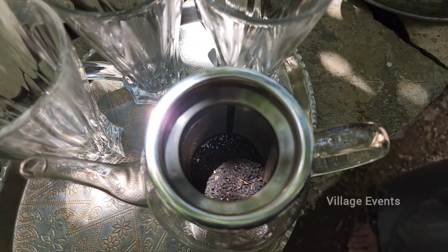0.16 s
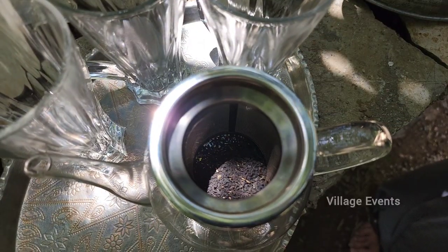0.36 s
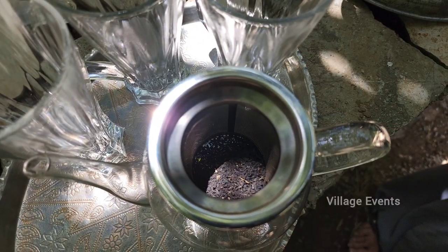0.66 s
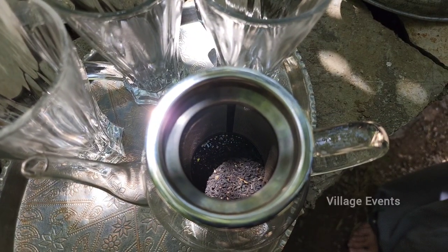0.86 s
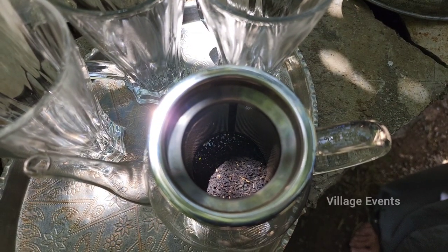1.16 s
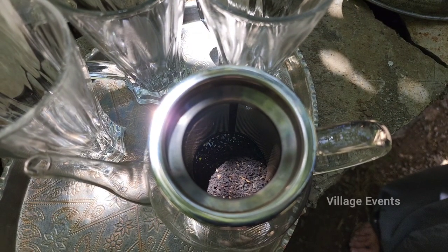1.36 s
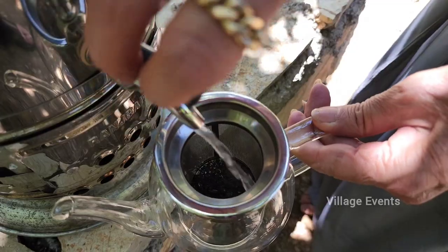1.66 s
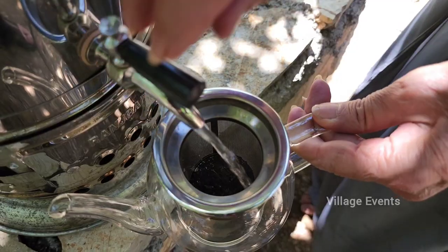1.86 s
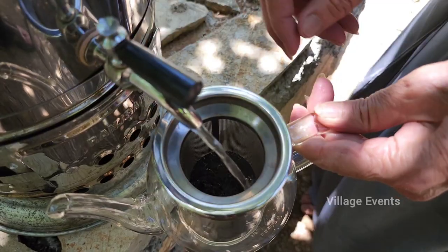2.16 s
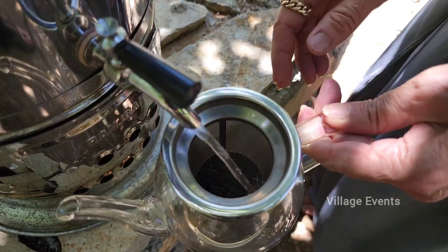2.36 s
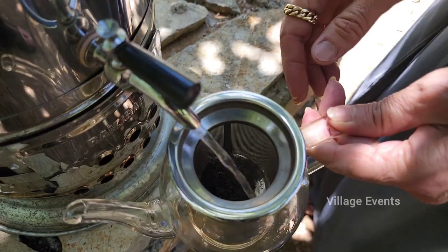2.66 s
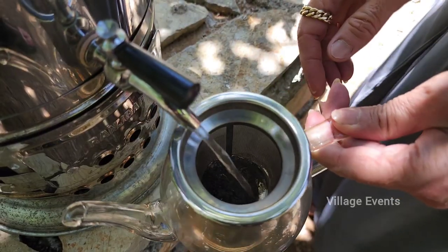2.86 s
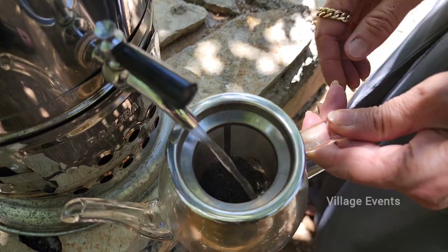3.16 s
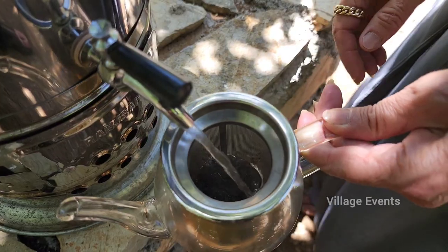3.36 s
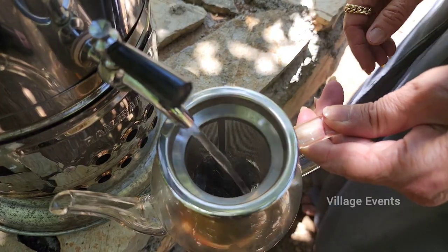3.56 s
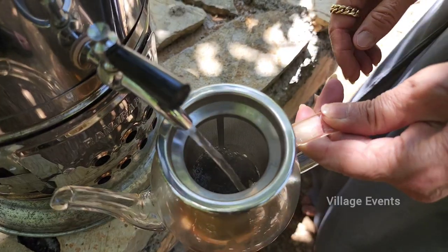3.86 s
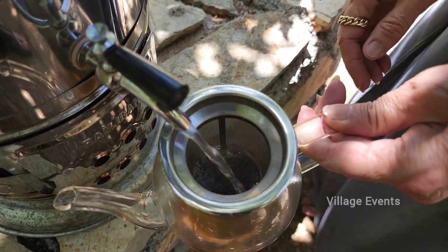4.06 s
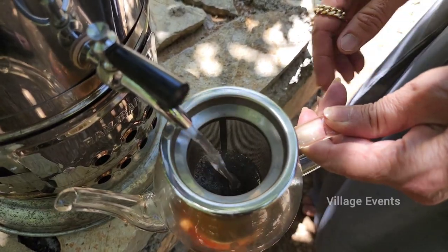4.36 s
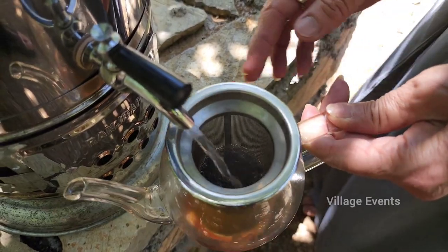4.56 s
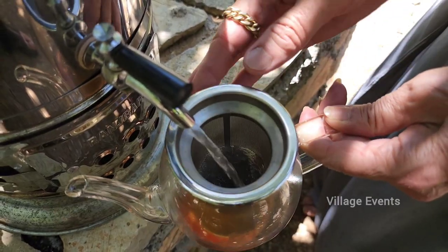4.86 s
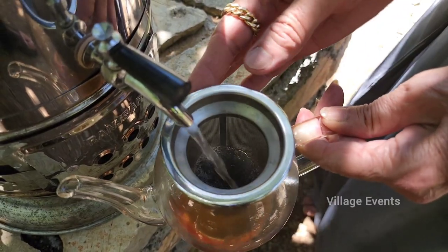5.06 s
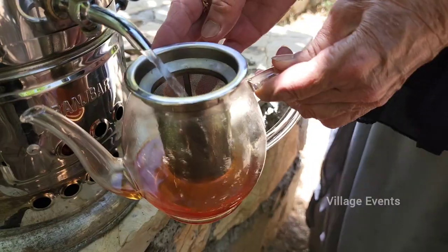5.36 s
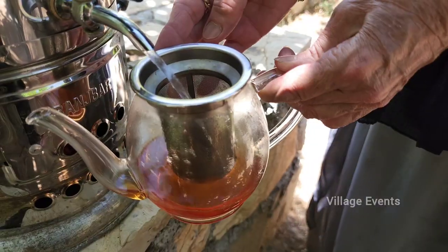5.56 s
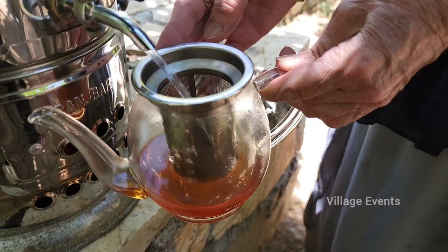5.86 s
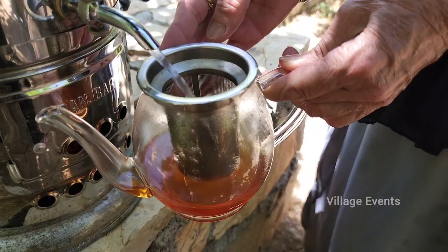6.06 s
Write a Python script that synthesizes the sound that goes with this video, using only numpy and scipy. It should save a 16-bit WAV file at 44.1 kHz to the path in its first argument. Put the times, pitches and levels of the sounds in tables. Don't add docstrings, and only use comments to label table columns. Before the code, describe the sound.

A shaded outdoor terrace, heard close on a handheld stereo microphone, with a dense high cicada buzz throughout and a faint low wavering hum. At about 0.25 s a soft wind gust comes with dull knocks and small ticks, another bright tick at 0.4 s. A light glass-metal clink sounds at 0.9 s on the right, then a loud, hard, ringing clink at 1.2 s, followed by ticks and knocks to 1.5 s. An abrupt cut: the cicadas drop a little and water trickles into a pot on the left, hollow low gurgling with tiny bright bubbles. Faint knocks and a rustle near 2.6 s. A drip plinks at 3.85 s; the stream falters around 4.1-4.4 s with small drips, then surges, with knocks at 4.5-4.7 s. After another cut at 5.15 s the trickle is softer, with many light dull taps and low wind thumps, strongest near 5.4 s, until 6.3 s.

```python
import sys
import numpy as np
from scipy import signal
from scipy.fft import rfft, irfft, next_fast_len
from scipy.io import wavfile

SR = 44100
rng = np.random.default_rng(int(sys.argv[2]) if len(sys.argv) > 2 else 0)


def level_to_linear(level):
    exponent = np.asarray(level, float) / 20
    return 10 ** exponent


def master_out(mix):
    frames = np.transpose(np.atleast_2d(mix))
    ceiling = np.clip(frames, -1, 1)
    pcm = np.round(ceiling * 32767).astype(np.int16)
    wavfile.write(sys.argv[1], SR, pcm)


N = 273508
T = np.arange(N) / SR


def rms_one(x):
    return x / np.sqrt(np.mean(x ** 2) + 1e-20)


def in_time(rows):
    s, *columns = np.transpose(rows)
    return [np.interp(T, s, column) for column in columns]


def at_hz(points, hz):
    table_hz, values = np.array(points)[:, :2].T
    return np.interp(np.log(hz), np.log(table_hz), values)


def band(x, low_hz, high_hz):
    return signal.sosfilt(signal.butter(2, [low_hz, high_hz], "band", fs=SR, output="sos"), x)


def drift(rate_hz):
    r = np.exp(-80 * np.pi * rate_hz / SR)
    slow = signal.lfilter([1], [1, -2 * r, r * r], rng.standard_normal(N // 40 + 2002))[2000:]
    return np.interp(np.arange(N) / 40, np.arange(len(slow)), rms_one(slow))


def ring(clicks, hz, t60_s):
    r, w = level_to_linear(-60 / (t60_s * SR)), 2 * np.pi * hz / SR
    return signal.lfilter([0, np.sin(w)], [1, -2 * r * np.cos(w), r * r], clicks + 1e-18)


def struck(blow, hz, t60_s):
    return band(ring(blow, hz, t60_s), .88 * hz, 1.13 * hz)


def place(x, pan_db, lag):
    left = level_to_linear(pan_db / 2) * np.roll(x, max(lag, 0))
    right = level_to_linear(-pan_db / 2) * np.roll(x, max(-lag, 0))
    return np.array([left, right])


def add(out, s, sound):
    i = round(s * SR)
    out[:, i:i + sound.shape[1]] += sound[:, :N - i]


TAKES_S = [0, 1.497, 5.155, 6.3]


def take_at(s):
    return np.searchsorted(TAKES_S, s, side="right") - 1


# level_db, left_right_db, fall_db_per_s
CHORUS = [
    (-37.5, -0.1, 0),
    (-41.5, .6, 0.15),
    (-42, 3, 0.2),
]
# membrane_hz, level_db, t60_s
SINGERS = [(6000, -11.5, 0.0041), (6490, -4, 0.011), (6720, -4, 0.019), (6896, 0, 0.013),
           (7163, -2.5, 0.028), (7790, 1, 0.0038), (7750, -6.5, 0.014), (8125, -3, 0.036),
           (8200, 0, 0.0039), (7970, -6.5, 0.0024), (8634, -1.5, 0.008), (9130, -6, 0.008),
           (9550, -8.5, 0.0063), (10040, -14, .006)]


def cicadas(spread_db, swell_db, jitter):
    out = np.zeros((2, N))
    for side in range(2):
        for hz, db, t60_s in SINGERS:
            rate_hz, detune = rng.uniform(150, 400), rng.normal(0, 0.009)
            gaps = SR / rate_hz * (1 + jitter * rng.standard_normal(3000)).clip(.2)
            at = np.cumsum(gaps).astype(int)
            sizes = level_to_linear(spread_db * rng.standard_normal(3000))
            clicks = np.zeros(N)
            clicks[at[at < N]] = sizes[at < N]
            membrane = rms_one(ring(clicks, hz * (1 + detune), t60_s))
            song = level_to_linear(db + swell_db * drift(8.2)) * membrane
            out[side] += song
            out[1 - side] += 0.59 * np.roll(song, rng.integers(5, 25))
    take = take_at(T)
    start_db, pan_db, fall_db = np.transpose(CHORUS)[:, take]
    level_db = start_db - fall_db * (T - np.take(TAKES_S, take)) + 0.14 * drift(4.5)
    pan_db = pan_db - 0.75 * drift(1.6)
    return rms_one(band(out, 6430, 11900)) * level_to_linear(level_db + 2.5 + pan_db * np.array([[.5], [-.5]]))


# start_s, level_db
FLOW = [(1.5, 2), (1.8, 0), (2.45, 2), (2.8, 2), (3.7, 0), (4.1, 0.5), (4.3, -16), (4.6, 4), (5.1, 1.5),
        (5.5, -6.5), (6.2, -5)]
# resonance_hz, width_hz
POT_AIR = [
    (285, 68),
    (590, 98),
]


def water():
    flow_db, = in_time(FLOW)
    gurgle_db = -54.5 + 1.0 * flow_db
    overtone_db = -57 + .8 * flow_db
    trickle_db = -56.5 + 0.65 * flow_db
    sizes = level_to_linear(2.5 * np.minimum(rng.exponential(1, (3, N)), 5)) * rng.choice([-1, 1], (3, N))
    births_per_s = np.array([[350], [350], [900]]) * level_to_linear(4.5 * drift(7))
    low, high, small = sizes * (rng.random((3, N)) < births_per_s / SR)
    (pot_hz, pot_width_hz), (overtone_hz, overtone_width_hz) = POT_AIR
    out = level_to_linear(gurgle_db) * rms_one(ring(low, pot_hz, 2.26 / pot_width_hz))
    out += level_to_linear(overtone_db) * rms_one(ring(high, overtone_hz, 2.7 / overtone_width_hz))
    dealt = rng.integers(0, 10, N)
    fizz = sum(ring(small * (dealt == k), hz, 13.0 / hz) for k, hz in enumerate(np.geomspace(1150, 3300, 10)))
    shade_db = -3 * (T > TAKES_S[2])
    out += level_to_linear(trickle_db + shade_db) * rms_one(fizz)
    return place(out * (T > TAKES_S[1]), pan_db=5.5, lag=FAR_LAG[1])


# start_s, peak_db, pitch_hz
DRIPS = [
    (3.842, -33, 1950),
    (4.064, -45, 2030),
    (4.079, -46, 2030),
    (4.110, -40, 1850),
]


def drips():
    out, t = np.zeros((2, N)), T[:3000]
    t60_s, rise_hz_per_s = 0.035, 6800
    for s, db, hz in DRIPS:
        tone = np.sin(2 * np.pi * (hz + rise_hz_per_s * t / 2) * t)
        bubble = tone * level_to_linear(db - 60 * t / t60_s) * np.minimum(t / .002, 1)
        add(out, s, place(bubble, pan_db=9, lag=FAR_LAG[1]))
    return out


NEAR_LAG = [20, -14, -14]
CLINKS_S = [
    .8936,
    1.2094,
]
# crack_db, tail_db, tail_t60_s, left_right_db
CLINKS = [
    (-26, -31, .08, -8),
    (-7, -19, 0.12, -13),
]
# mode_hz, left_db, right_db, t60_s
LIGHT_CLINK = [(1050, -35, -33, .08), (2040, -33, -35, .1), (2215, -37, -32, .17), (2275, -21, -16.5, .075),
               (2320, -34, -30, .17), (3050, -26, -15, .11), (3830, -40, -36, .15), (4288, -35, -26, .045),
               (5050, -36, -25, .05), (5146, -42, -35, .05), (6263, -41, -33, .04), (10800, -44, -36, .015),
               (13100, -45, -37, .015), (15300, -47, -39, .015)]
HARD_CLINK = [(300, -33, -34, .04), (610, -27, -28, .19), (820, -25, -25, .05), (1063, -27, -26, .18),
              (1214, -31, -20, .045), (1545, -41, -43, .4), (2072, -20, -20, .13), (2221, -39, -33, .35),
              (2150, -28, -28, .05), (2235, -10, -6, .046), (2317, -29, -22.5, .27), (3062, -31, -37, .27),
              (3150, -24, -16, .04), (3804, -39, -26, .19), (4027, -34, -26, .1), (4280, -42, -33, .14),
              (4620, -21, -16, .035), (4705, -33, -22, .15), (4993, -38, -30, .13), (5572, -30, -20, .03),
              (5990, -38, -33, .12), (6535, -32, -26, .03), (8002, -28, -19, .025), (11453, -28, -17, .04),
              (12632, -29, -18, .045), (13937, -32, -21, .04), (15200, -35, -25, .045)]


def clinks():
    out, t = np.zeros((2, N)), T[:16000]
    for s, row, modes in zip(CLINKS_S, CLINKS, [LIGHT_CLINK, HARD_CLINK]):
        crack_db, tail_db, tail_t60_s, pan_db = row
        contacts = rng.standard_normal(16000) * (rng.random(16000) < 900 / SR)
        chatter = contacts * level_to_linear(-31 - 60 * t / .12)
        blow = (t == 0) + chatter
        body = np.zeros((2, 16000))
        for hz, left_db, right_db, t60_s in modes:
            mode = place(struck(blow, hz, t60_s), left_db - right_db, NEAR_LAG[0])
            body += mode * level_to_linear((left_db + right_db) / 2)
        crack = band(rng.standard_normal(16000), 2500, 14300) * level_to_linear(crack_db - 60 * t / .017)
        tail = band(rng.standard_normal((2, 16000)), 2700, 7000)
        tail = tail * level_to_linear(tail_db - 60 * t / tail_t60_s) * np.minimum(t / 0.0019, 1)
        tail = tail * level_to_linear([[pan_db / 2], [-pan_db / 2]])
        add(out, s, body + place(crack, pan_db, NEAR_LAG[0]) + tail)
    return out


# start_s, peak_db, pitch_hz
KNOCKS = [(.2613, -26.5, 456), (0.2656, -26, 760), (.272, -28.5, 684), (1.2125, -30.5, 240),
          (1.3019, -25, 309), (1.328, -28, 530), (1.402, -36.5, 294), (1.491, -33, 280), (2.546, -39, 600),
          (2.586, -37, 586), (2.67, -40, 550), (2.718, -43, 596), (4.279, -37, 300), (4.539, -31, 644),
          (4.665, -31, 650), (4.947, -42, 630), (5.241, -39, 790), (5.27, -41, 680), (5.29, -39, 680),
          (5.355, -35, 696), (5.405, -43, 640), (5.447, -41, 730), (5.463, -46, 746), (5.514, -39, 770),
          (5.526, -33.5, 720), (5.545, -41, 715), (5.621, -39, 725), (5.643, -43, 640), (5.71, -44, 705)]
HANDS_PAN_DB = [-2, 5.5, 3.5]


def knocks():
    out = np.zeros((2, N))
    push = np.zeros(6000)
    push[:30] = np.hanning(30) / 15
    for s, db, hz in KNOCKS:
        t60_s = 21 / hz
        body = ring(push, hz, t60_s) + 0.67 * ring(push, 1.314 * hz, 0.37 * t60_s)
        knock = level_to_linear(db + 3.0) * band(body, 254, 2200)
        add(out, s, place(knock, HANDS_PAN_DB[take_at(s)], NEAR_LAG[take_at(s)]))
    return out


# start_s, level_db, centre_hz, sizzle_db
TICKS = [
    (.2335, -30, 1910, -25),
    (0.2856, -39, 3700, -3),
    (0.3904, -29.5, 2600, -3),
    (0.3924, -30, 3620, -20),
    (1.2844, -31, 2800, -6),
    (1.327, -27, 3600, -4),
    (1.355, -36, 3000, -6),
    (3.465, -44, 3000, -30),
]
TREBLE_PAN_DB = [-16.5, -2, 7]


def ticks():
    out, t = np.zeros((2, N)), T[:3000]
    spread, t60_s = 1.87, 0.021
    for s, db, hz, sizzle_db in TICKS:
        puff = rng.standard_normal(3000) * level_to_linear(-60 * t / t60_s) * np.minimum(t / 0.0012, 1)
        tick = band(puff, hz / spread, hz * spread) + level_to_linear(sizzle_db) * band(puff, 6900, 15000)
        add(out, s, place(level_to_linear(db + 6.5) * tick, TREBLE_PAN_DB[take_at(s)], NEAR_LAG[take_at(s)]))
    return out


# start_s, length_s, low_hz, high_hz, level_db
RUSTLES = [(0.256, .048, 2500, 5500, -45), (0.26, 0.048, 10200, 14000, -44.5),
           (1.043, .05, 10500, 15500, -49), (1.273, 0.069, 2480, 6000, -47.5),
           (1.288, 0.055, 9500, 15500, -47.5), (1.667, .05, 9000, 14000, -50),
           (2.5, 0.065, 10000, 15000, -52), (2.57, 0.15, 600, 5000, -44.5), (4.259, 0.069, 200, 885, -51),
           (4.583, .1, 10000, 15000, -55), (4.959, 0.04, 3500, 6000, -49), (5.217, .42, 620, 860, -57.5)]


def rustles():
    out = np.zeros((2, N))
    for s, length_s, low_hz, high_hz, db in RUSTLES:
        size = round(length_s * SR)
        grain_db = 2.8 * np.repeat(rng.standard_normal(200), 100)
        grains = (rng.standard_normal((3, 20000)) * level_to_linear(grain_db))[:, :size]
        swell = np.sin(np.linspace(0, np.pi, size)) ** 1.25
        near, *own = rms_one(band(grains, low_hz, min(high_hz, 16000))) * swell
        shared = place(near, TREBLE_PAN_DB[take_at(s)], NEAR_LAG[take_at(s)])
        add(out, s, level_to_linear(db) * (shared + 0.85 * np.array(own)))
    return out


CALM_DB = [-81, -70.5, -60]
# start_s (of the peak), rise_db
GUSTS = [
    (.23, 18),
    (4.1, 7),
    (4.75, 11),
    (5.64, 2),
    (6.09, 7),
]
# start_s, length_s, pitch_hz (at the start), level_db, left_right_db
PUFFS = [
    (5.188, 0.024, 60, -28.5, 21.5),
    (5.361, 0.067, 67.3, -14.5, 24),
    (5.44, 0.037, 55, -24, 16),
    (5.646, 0.035, 55, -31, -14),
    (5.947, .05, 55, -38, -18),
]


def wind():
    lumps = band(rng.standard_normal((2, N)), 25, 97) * level_to_linear(3.8 * np.array([drift(3.8), drift(5.5)]))
    gust_db = sum(db * np.exp(-((T - s) / 0.19) ** 2) for s, db in GUSTS)
    force_db = np.take(CALM_DB, take_at(T)) + gust_db
    out = rms_one(lumps) * level_to_linear(force_db + np.array([[1.5], [-4.5]]))
    for s, length_s, hz, db, pan_db in PUFFS:
        x = np.linspace(0, 1, round(length_s * SR))
        phase = 2 * np.pi * np.cumsum(hz * (1 - 0.3 * x)) / SR
        eddy = np.sqrt(np.sin(np.pi * x).clip(0)) * np.sin(phase)
        add(out, s, place(level_to_linear(db - 17.0) * eddy, pan_db, lag=0))
    return out


# pitch_hz, waver_hz, level_db
HUM = [
    (100, 4.04, -57),
    (153, 4.24, -60.5),
    (790, 3.4, -73),
]


def hum():
    out = np.zeros(N)
    for hz, waver_hz, db in HUM:
        level = level_to_linear(db + 4.1 * drift(4.1))
        out += level * np.sin(2 * np.pi * np.cumsum(hz + waver_hz * drift(3.87)) / SR)
    return out


# band_hz, density_db (per Hz)
AIR = [
    [(30, -24), (60, -7.5), (140, -2.5), (190, -11), (300, -2.5), (390, -6), (570, -15.5), (1200, -13),
     (2000, -10.5), (5300, -19.5), (10500, -14.5), (12500, -13.5), (14000, -15), (15800, -16)],
    [(30, -19.5), (96, -6), (154, -4), (190, -17), (300, -1.5), (480, -10), (830, -16), (1350, -14),
     (2000, -10.5), (4300, -16), (10600, -23.5), (12500, -15), (14000, -21), (15800, -19.5)],
    [(30, -17), (98, 0), (158, -2.5), (190, -15.5), (300, -3), (480, -15.5), (830, -17), (1350, -17),
     (2000, -11.5), (4300, -19.5), (10600, -26.5), (12500, -17), (14000, -21.5), (15800, -24)],
]
AIR_DB = [-41, -44, -44]
# band_hz, left_right_db
AIR_BALANCE = [
    [(60, 1.5), (400, 1.5), (2000, .7), (4500, -3.5), (15000, -5)],
    [(60, 3), (400, 2.5), (1300, 6.5), (4400, 1.2), (15000, -2)],
    [(60, 1.5), (400, 3), (1300, 7), (4400, 2.5), (15000, 0)],
]
FAR_LAG = [7, -16, -15]
# band_hz, likeness (0 to 1)
LIKENESS = [(60, 0.98), (300, 0.85), (1000, 0.55), (2000, 0.063), (4000, 0.09), (15000, .03)]


def air():
    out, size = np.zeros((2, N)), next_fast_len(N)
    hz = np.maximum(np.arange(size // 2 + 1) * SR / size, 1)
    alike = np.clip(at_hz(LIKENESS, hz), 0, 1)
    common, left, right = rfft(rng.standard_normal((3, size)))
    for k, lag in enumerate(FAR_LAG):
        late = np.exp(-2j * np.pi * hz * lag / SR)
        directed = np.sqrt(alike) * common * [late, np.ones_like(late)]
        pair = directed + np.sqrt(1 - alike) * np.array([left, right])
        colour_db = at_hz(AIR[k], hz) + at_hz(AIR_BALANCE[k], hz) * [[.5], [-.5]]
        take = level_to_linear(AIR_DB[k]) * rms_one(irfft(pair * level_to_linear(colour_db), size)[:, :N])
        out += take * ((T >= TAKES_S[k]) & (T < TAKES_S[k + 1]))
    return out * level_to_linear(0.73 * drift(11.4))


def surroundings(x):
    out = np.zeros((2, N))
    for port in range(2):
        lags_s = np.exp(rng.uniform(np.log(.002), np.log(.04), 6))
        gains = [level_to_linear(-10) * drift(0.78) for echo in range(6)]
        echoes = sum(gain * np.roll(x[port], round(lag_s * SR)) for lag_s, gain in zip(lags_s, gains))
        out[port] = (x[port] + echoes) / np.sqrt(1 + np.sum(np.square(gains), axis=0))
    return out


def scene():
    steady = air() + cicadas(spread_db=2.0, swell_db=1.24, jitter=.2)
    bass = signal.sosfiltfilt(signal.butter(2, 800, fs=SR, output="sos"), steady)
    far = bass + surroundings(steady - bass) + hum() + wind()
    return far + water() + drips() + knocks() + ticks() + rustles() + clinks()


# start_s, fade_out_s, fade_in_s, depth_db
JOINS = [
    (1.499, 0.0019, 0.013, -12),
    (5.154, 0.0043, 0.021, -6.5),
]


def top_cut(x):
    return signal.sosfilt(signal.butter(12, 16410, fs=SR, output="sos"), x)


def record(dry):
    for s, out_s, in_s, depth_db in JOINS:
        corners_s = [s - out_s, s, s + 0.0045, s + 0.004 + in_s]
        dry = dry * level_to_linear(np.interp(T, corners_s, [0, depth_db, depth_db, 0]))
    cut = signal.sosfilt(signal.ellip(12, .5, 60, 15710, fs=SR, output="sos"), dry)
    return top_cut(np.clip(cut, -1, 1))


dry = scene()
out = record(dry)
master_out(out)
```